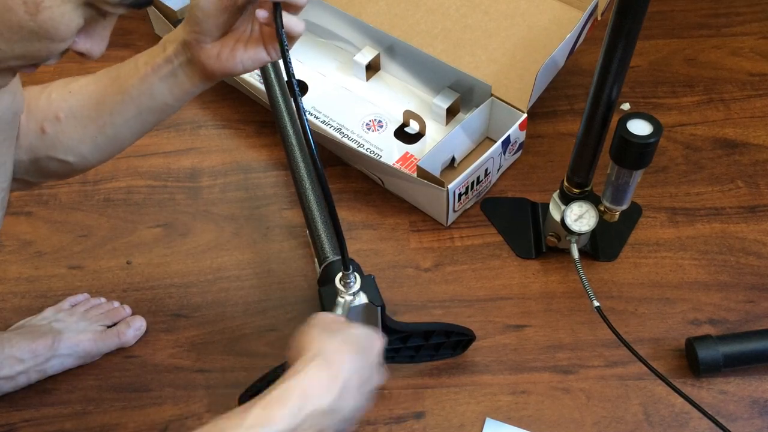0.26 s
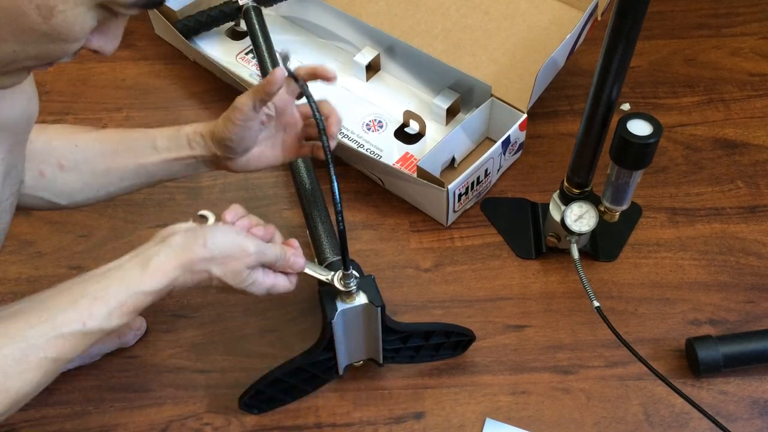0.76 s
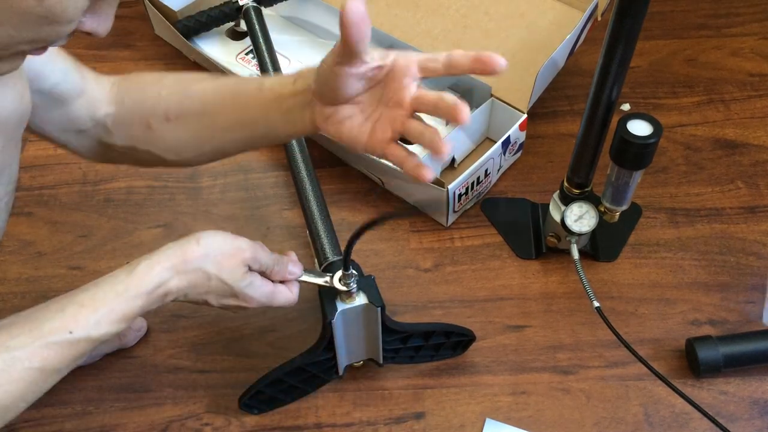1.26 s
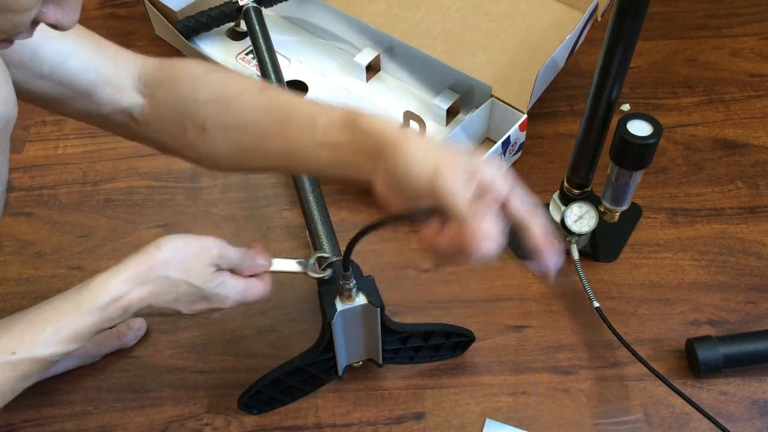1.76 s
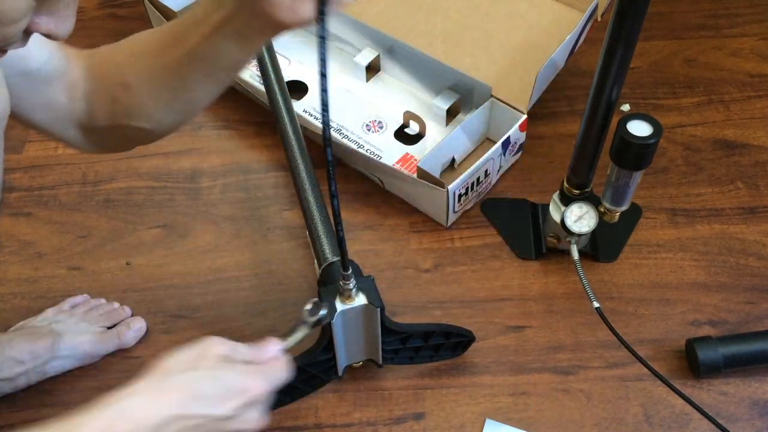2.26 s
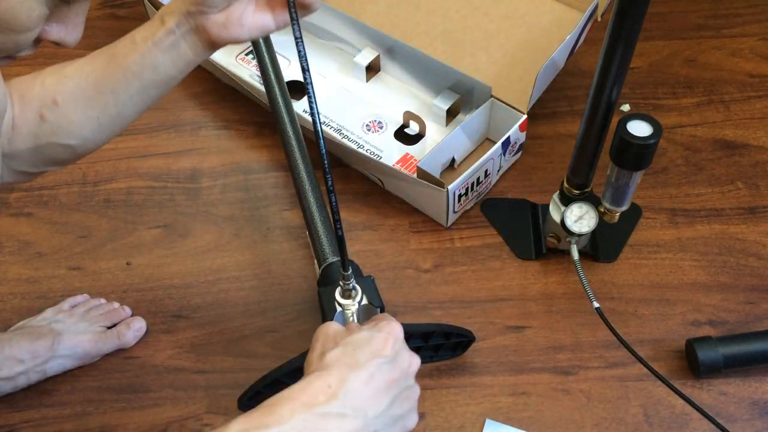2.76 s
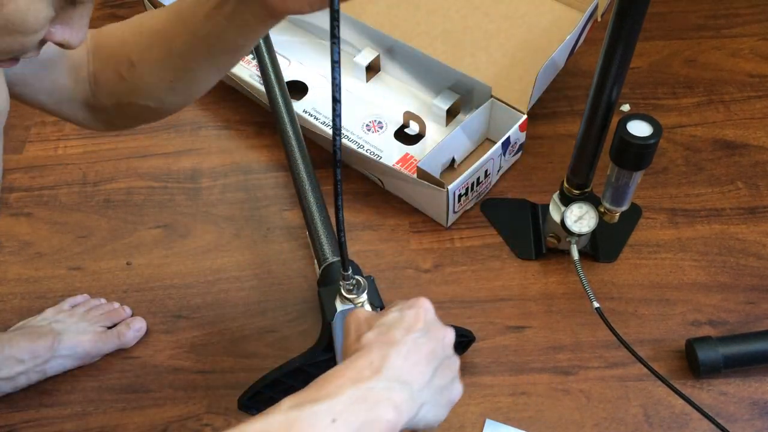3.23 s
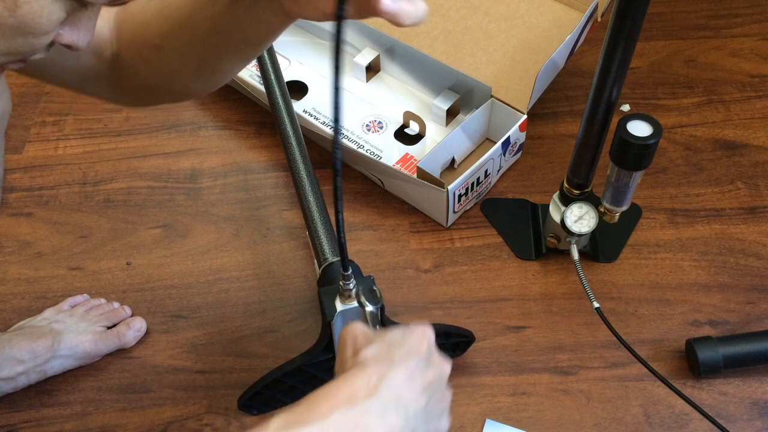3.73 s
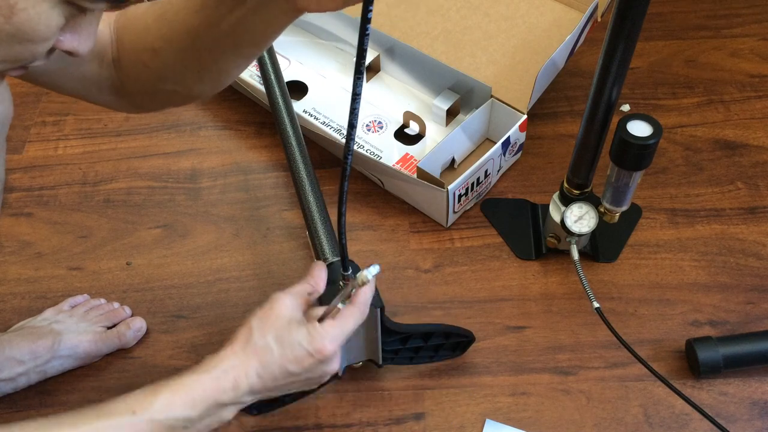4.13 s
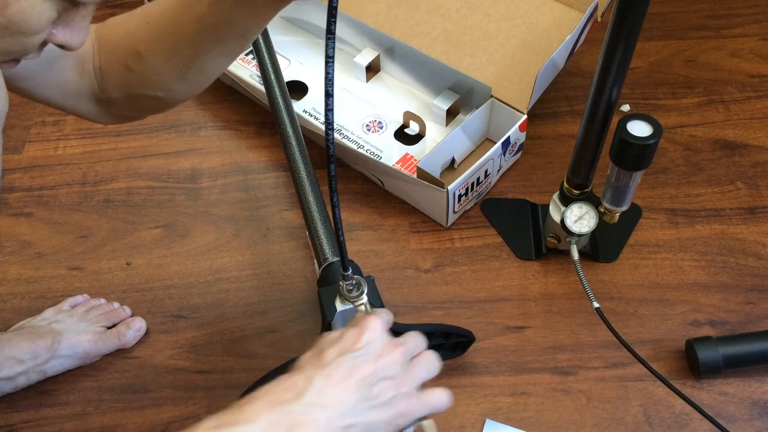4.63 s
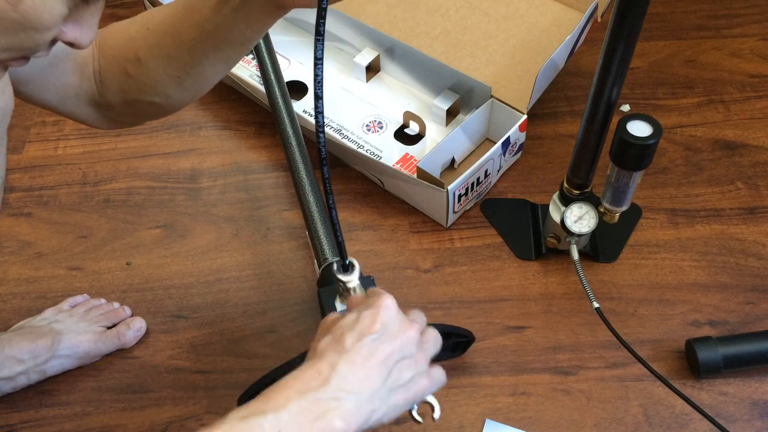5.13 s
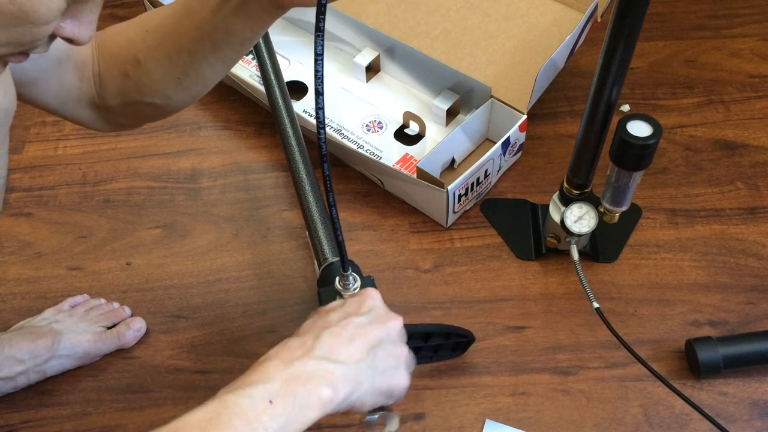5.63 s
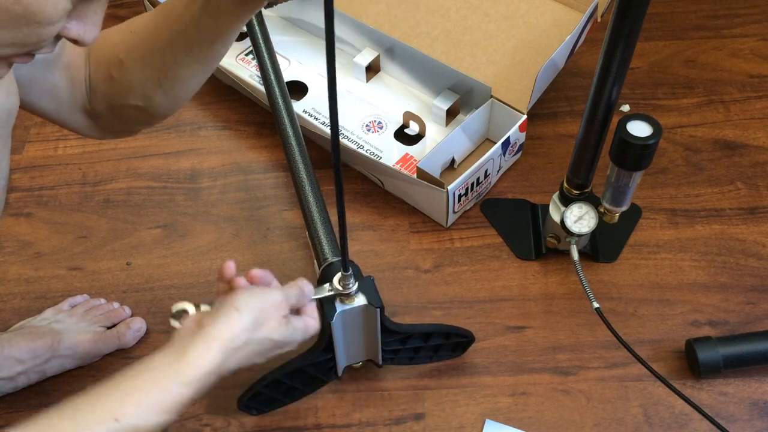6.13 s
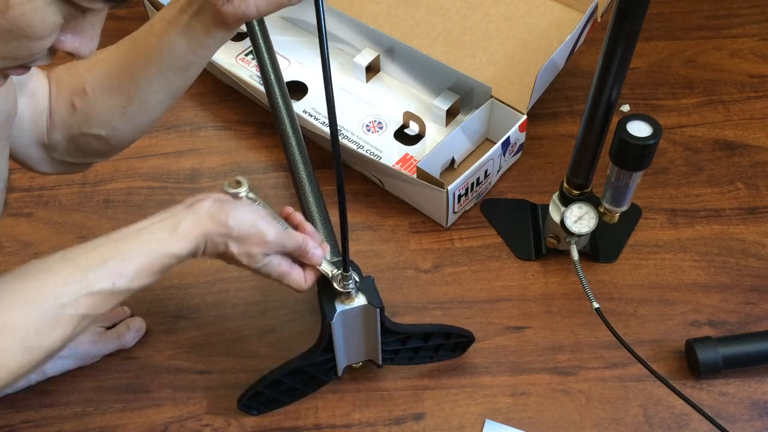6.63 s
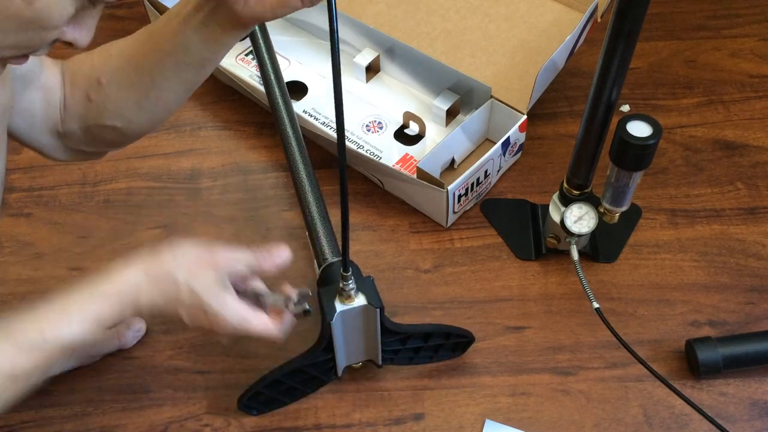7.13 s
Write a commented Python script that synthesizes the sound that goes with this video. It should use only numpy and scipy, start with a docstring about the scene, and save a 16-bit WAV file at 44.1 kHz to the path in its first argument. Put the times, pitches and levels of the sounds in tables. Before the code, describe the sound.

A small wrench clicks and clinks on a steel fitting in scattered clusters, with one hose slap on a wooden floor, in a quiet room.

```python
"""Knocks, clinks and gritty slides: a small wrench on the steel hose fitting of a hand pump on a wooden floor.
Each tap is a noise crack that rings damped modes of fitting, pump tube and boards; the wrench clinks on its own.
Slides are dense random catches with grit; a stiff hose slaps once, handling ticks and the boards thud softly.
A quiet furnished room answers with a diffuse noise tail, over rumble, hum and microphone hiss."""
import sys
import numpy as np
from scipy import signal
from scipy.fft import rfft, irfft, next_fast_len
from scipy.io import wavfile
from scipy.ndimage import uniform_filter1d

SR = 44100
rng = np.random.default_rng(int(sys.argv[2]) if len(sys.argv) > 2 else 0)


def materialize(psi):
    """Save the field psi as 16-bit PCM at rate SR to the path in sys.argv[1].

    A 1-D psi becomes a single channel; in a 2-D psi each row is a channel.
    """
    bounded = np.clip(np.atleast_2d(psi).T, -1, 1)
    quanta = np.round(bounded * 32767).astype(np.int16)
    wavfile.write(sys.argv[1], SR, quanta)


def ratio_of_db(decibels):
    """Turn decibels (scalar or array-like) into linear amplitude factors; 0 dB maps to 1."""
    return 10 ** (np.asarray(decibels, float) / 20)


N = 325458

# Wrench on fitting, levels before the layer trims. Each row: start in seconds, crack level in dB,
# then boards, tube and treble level in dB relative to the crack.
TAPS = [(0.0154, -60, 7, -7, -18), (0.0388, -53, 5, 15, -8), (0.0735, -33.5, -11.5, -3.5, -21),
        (0.0839, -34, -25, -3.5, -22), (0.087, -33.5, -10.5, -12, 13), (0.2528, -51.5, -3, 0.5, -19),
        (1.0143, -68.5, 1, 20, -14), (1.0285, -48.5, -8, -3.5, -53), (2.7169, -19, -16.5, -11.5, -6.5),
        (2.7393, -31.5, -6.5, 0, -1), (2.959, -28, -10.5, -5, -10.5), (3.239, -37.5, -5.5, -3, -23),
        (3.3229, -30.5, -31.5, -17, -19.5), (3.697, -66, -2, 8, -20), (4.7093, -23, -20, -14, -12),
        (4.7319, -39, -12.5, -0.5, -25), (4.768, -31, -31, -20.5, -24), (4.9052, -36.5, -34, -16.5, -25),
        (5.0836, -31, -8, -11.5, -6), (5.1083, -30, -14, -11.5, -2), (5.18, -37.5, -25, -42, -17),
        (5.201, -42, -11, -6.5, 9), (5.2789, -25.5, -19, -11, -24), (5.2996, -27.5, -8, -5.5, -41),
        (5.3268, -23.5, -17.5, -14, -39), (5.3646, -21, -19.5, -20.5, -12), (5.3684, -19, -21, -20, -8.5),
        (5.5039, -30, -8, -5.5, -39), (5.5928, -65.5, 6, 19, -9.5), (6.8687, -43, -12.5, 4, -23),
        (6.8908, -36.5, -10.5, -4.5, -25), (6.9091, -23.5, -27, -10.5, 5), (6.9376, -28, -12, -15, -12),
        (6.9624, -21.5, -20, -21.5, 1), (6.9886, -25.5, -18, -32, -11)]
# Ringing modes of the pump tube. Each row: frequency in Hz, relative level in dB, t60 in seconds.
TUBE = [(355, -6, 0.13), (493, -6, 0.03), (566, -5.5, .06), (700, -9.5, .05), (861, -7.5, 0.13),
        (910, -5.5, 0.17), (1019.3, -1.5, 0.13), (1134, -4.5, 0.053), (1243, -7.5, 0.087),
        (1417, -8.5, 0.059), (1611.5, -7, 0.056), (1963, -10.5, 0.067)]
# Ringing modes of the floor boards. Each row: frequency in Hz, relative level in dB, t60 in seconds.
BOARDS = [(72, -11.5, 0.49), (110.04, -10, 0.35), (161, -19.5, 0.096), (183.4, 2, .18), (230, -13.5, 0.13),
          (303.5, -8, 0.18), (345, -5, 0.099)]


def colour(noise, points):
    """Shape the spectrum of a noise by (Hz, dB) points, then bring it back to rms 1."""
    hz, db = np.transpose(points)
    size = next_fast_len(len(noise))
    f = np.fft.rfftfreq(size, 1 / SR) + 1
    gain = ratio_of_db(np.interp(np.log(f), np.log(hz), db))
    shaped = irfft(rfft(noise, size) * gain, size)[:len(noise)]
    return shaped / np.sqrt(np.mean(shaped ** 2))


def hump(hz, centre_hz, db_per_octave):
    """Levels in dB that fall away on both sides of a centre."""
    return -db_per_octave * np.abs(np.log2(np.asarray(hz) / centre_hz))


def walk(rate):
    """Random levels, each held 1 / rate seconds, then smoothed twice into slow ramps."""
    hold = int(SR / rate)
    steps = np.repeat(rng.standard_normal(N // hold + 1), hold)
    return uniform_filter1d(uniform_filter1d(steps, hold), hold)[:N]


def ring(drive, hz, t60):
    """One damped mode as a resonator; a unit blow rings with amplitude near 1."""
    radius = np.exp(-np.log(1000) / (max(t60, .005) * SR))
    w = 2 * np.pi * hz / SR
    return signal.lfilter([np.sin(w)], [1, -2 * radius * np.cos(w), radius * radius], drive)


def strike(modes, s, db, scatter_db, push_ms, detune, flutter_db):
    """Blows at times s ring damped modes, with random scatter in each mode's level, phase and pitch.

    db is given per blow, or per mode and blow; detune is a share of the frequency."""
    hz, mode_db, t60 = np.transpose(modes)[:, :, None]
    out = np.zeros(N + SR)
    t = np.arange(int(SR * min(t60.max(), .5))) / SR
    chance = rng.standard_normal((len(s), 3, len(modes), 1))
    db = np.broadcast_to(db, (len(modes), len(s)))
    # random level flutter roughens every ringing mode
    flutter = ratio_of_db(flutter_db * walk(120))
    start = rng.integers(0, N - len(t), (len(s), len(modes)))
    push_s = np.clip(np.broadcast_to(push_ms, len(s)), .1, 60) / 1000
    decay = np.exp(-np.log(1000) * t / np.maximum(t60, .005))
    for k, (level, pitch, phase) in enumerate(chance):
        fade = decay * (1 - np.exp(-t / push_s[k]))  # a longer push swells in more slowly
        tone = np.sin(2 * np.pi * (hz * (1 + detune * pitch) * t + phase))
        tone *= [flutter[i:i + len(t)] for i in start[k]]
        gain = ratio_of_db(db[:, k:k + 1] + mode_db + scatter_db * level)
        at = int(s[k] * SR)
        out[at:at + len(t)] += np.sum(gain * fade * tone, axis=0)
    return out[:N]


def add_burst(out, s, db, points, fall_s):
    """Mix in a short coloured noise that falls exponentially with time constant fall_s."""
    at, t = int(s * SR), np.arange(2048) / SR
    burst = colour(rng.standard_normal(len(t)), points) * np.exp(-t / fall_s) * ratio_of_db(db)
    out[at:at + len(t)] += burst[:N - at]


def cracks():
    """Contact noise of each tap, as bright as the contact."""
    out = np.zeros(N)
    for s, db, _, tube_db, treble_db in TAPS:
        points = [(150, tube_db + 2.0), (1200, tube_db + 11.5), (3500, 0),
                  (7000, treble_db / 2 + 3.5), (13000, treble_db + 3.5)]
        add_burst(out, s, db - 8.5, points, fall_s=0.00392)
    return out


def taps():
    """Crack, then fitting, tube and boards ring; the boards take a longer, softer push."""
    # Modes of the steel fitting. Each row: frequency in Hz, relative level in dB, t60 in seconds.
    fitting_modes = [(2140, -13, 0.019), (2480, 7, 0.012), (3093, -4.5, 0.036), (5010, -1, 0.021),
                     (5950, 0.5, 0.012), (7380, -4.5, 0.014), (9200, 2.5, 0.017), (11030, -2, 0.012)]
    s, db, boards_db, tube_db, treble_db = np.transpose(TAPS)
    scatter_db = 2.5
    # the tap's treble level comes in gradually from 3.5 to 13 kHz
    height = np.clip(np.log(np.array(fitting_modes)[:, :1] / 3500) / np.log(13000 / 3500), 0, 1)
    fitting_db = db - 15.5 + (treble_db + 4.0) * height
    fitting = strike(fitting_modes, s, fitting_db, scatter_db, 0.9, 0.03, scatter_db)
    tube = strike(TUBE, s, db + tube_db - 8.0, scatter_db, 0.49, 0.014, 2 * scatter_db)
    boards = strike(BOARDS[2:], s, db + boards_db + 3.5, scatter_db / 2, 10.2, 0.0087, scatter_db)
    return cracks() + fitting + tube + boards


def clinks():
    """A blow near a node of a bending mode hardly rings it; harder contact tilts the ring to the treble."""
    # Wrench modes. Each row: frequency in Hz, relative level in dB, t60 in seconds.
    wrench_modes = [(4390, -9, .14), (4470, -11, .12), (5400, -9, .12), (7290, -4, .2), (7380, -6, .16),
                    (9700, -5, .14), (11580, 0, .22), (11760, -6, .12), (12520, 0, .1), (13230, -2, .22),
                    (15150, -3, .15)]
    # The loosely held wrench rings on. Each row: start in seconds, level in dB before the mode shape,
    # spot hit as a share of its length, tilt in dB per octave.
    blows = [(0.0874, -55, 0.414, -7), (1.69, -57.5, 0.638, -3), (2.7172, -44.5, 0.84, 3.5),
             (2.8684, -63.5, 0.936, 3), (2.9597, -57, 0.408, -14.0), (3.322, -51.5, 0.435, -20),
             (3.6973, -67.5, 0.804, -6), (4.7088, -44.5, 0.542, 0.2), (4.7686, -50.5, 0.41, -11.5),
             (4.903, -61, 0.422, -17), (5.084, -53, 0.636, -1.5), (5.1062, -40, 0.64, -1),
             (5.198, -53, 0.254, -15.5), (5.279, -49, 0.94, -7), (5.3253, -54, 0.654, -4),
             (5.364, -39, 0.422, -7), (6.9094, -40, 0.66, 2.5), (6.938, -39, 0.962, -8),
             (6.9608, -39.5, 0.578, -11)]
    bending_hz, node_leak, tilt_centre_hz = 150, .03, 7300  # one half-wave fits the wrench at bending_hz
    s, db, spot, tilt_db = np.transpose(blows)
    hz = np.array(wrench_modes)[:, :1]
    half_waves = np.sqrt(hz / bending_hz)
    shape = np.abs(np.cos(np.pi * spot * half_waves)) + node_leak
    mode_db = db + 20 * np.log10(shape) + tilt_db * np.log2(hz / tilt_centre_hz)
    return strike(wrench_modes, s, mode_db, scatter_db=0.66, push_ms=0.14, detune=0.00163, flutter_db=5)


def slide():
    """Dense uneven catches of jaws and hose ring tube and boards; grit hisses along."""
    # One stroke a row, before the layer trims. Each row: time of full strength in seconds,
    # hold in seconds, level in dB, treble in dB relative to that level.
    strokes = [(0.002, 0.062, -49.5, -4.5), (0.081, 0.0054, -49, 7), (0.255, 0.09, -69, -23),
               (1.0, 0.12, -69, -26), (1.028, 0.0038, -72, -31), (1.24, .11, -67, -16.5),
               (1.459, .018, -45.5, -26), (1.496, 0.042, -27.5, -10), (1.581, 0.011, -33, -19),
               (1.66, 0.18, -53, -11), (2.956, .004, -49, -4), (4.723, 0.014, -39.5, -19.5),
               (4.768, .006, -49.5, -21.5), (5.205, 0.031, -48, -12), (5.286, 0.0035, -32.5, -23),
               (5.365, 0.01, -34.5, -14), (6.876, .025, -49, -16), (6.908, 0.056, -38.5, -2),
               (6.959, 0.038, -35, -6)]
    # Grit spectrum. Each row: frequency in Hz, relative level in dB per Hz.
    grit_colour = [(150, -30.5), (250, -2.5), (889, -2), (1330, -8.5), (2990, -12.5), (3340, -20),
                   (4480, -15.5), (7000, -21.5), (9100, -43), (15400, -120)]
    rise_db_per_s, fall_db_per_s = 1799, 402
    t, gain, treble = np.arange(N) / SR, np.zeros(N), np.zeros(N)
    for s, held_s, db, treble_db in strokes:
        rise_db = rise_db_per_s * np.maximum(s - t, 0)
        fall_db = fall_db_per_s * np.maximum(t - s - held_s, 0)
        stroke = ratio_of_db(db - rise_db - fall_db)
        gain += stroke
        treble += stroke * ratio_of_db(treble_db)
    happens = rng.random(N) < 2500 / SR  # about 2500 catches a second
    catches = rng.standard_normal(N) * ratio_of_db(2.6 * rng.exponential(size=N)) * happens
    catches = gain * ratio_of_db(5 * walk(60)) * catches / catches.std()
    body = sum(ratio_of_db(db) * ring(catches, hz, t60) for hz, db, t60 in TUBE + BOARDS[3:])
    grit = gain * colour(rng.standard_normal(N), grit_colour)
    hiss_colour = [(3000, -24.5), (8000, -4.5), (12000, -1.0), (15500, -1.5)]
    hiss = treble * colour(rng.standard_normal(N), hiss_colour)
    return ratio_of_db(-43.5) * body + ratio_of_db(2.9 * walk(150)) * (ratio_of_db(-9) * grit + ratio_of_db(-13) * hiss)


def slap():
    """The hose end lands flat on the floor: a broad noise slap and the short hollow ring of the hose."""
    # Hose modes. Each row: frequency in Hz, relative level in dB, t60 in seconds.
    hose_modes = [(520, -13.5, .03), (695, -3.5, 0.011), (896, 2, 0.06), (995, -1, 0.035),
                  (1154, -4, 0.048), (1397, -1, 0.023), (1557, -2.5, 0.031), (1760, -2.5, .02),
                  (2710, -16.5, 0.028)]
    # Slap spectrum. Each row: frequency in Hz, relative level in dB per Hz.
    slap_colour = [(59, -41.5), (100, -14), (367, -13.5), (942, -9), (1880, -13), (3180, -20.5),
                   (5960, -24.5), (6480, -24.5), (15000, -35.5)]
    # The one landing: start in seconds, level in dB before the layer trims.
    landing = (1.4795, -2.5)
    s, db = landing
    out = strike(hose_modes, [s], db - 6.0, scatter_db=0.99, push_ms=1.6, detune=.004, flutter_db=1.8)
    add_burst(out, s, db - 9.5, slap_colour, fall_s=.008)
    return out


def ticks():
    """Dry little noise clicks, each with its brightest region, and one sharper snap."""
    # Fingers, hose and jaws tick. Each row: start in seconds, level in dB, brightest frequency in Hz.
    clicks = [(0.447, -52.5, 3930), (0.6988, -56.5, 3500), (1.469, -56, 11200), (1.5983, -46, 5700),
              (1.6276, -43, 4500), (1.6914, -53, 3050), (1.7158, -49, 2040), (1.786, -56, 12500),
              (1.813, -57, 5050), (2.012, -63.5, 2496), (2.0574, -50.5, 7190), (2.079, -48.5, 6910),
              (2.0895, -51, 2250), (2.0944, -47.5, 7780), (2.1972, -62, 2980), (2.2188, -59, 2970),
              (2.2383, -51.5, 10040), (2.253, -48, 4890), (2.358, -55, 5030), (2.3716, -57.5, 3140),
              (2.5256, -59, 6170), (3.896, -56, 7650), (4.0604, -66, 6540), (4.4494, -65.5, 7880),
              (5.9306, -57, 5080), (6.0385, -64, 7440), (6.697, -58.5, 2730)]
    # The jaw snaps off the nut: start in seconds, level in dB, brightest frequency in Hz,
    # fall in dB per octave, contact in milliseconds.
    snap = (5.5056, -19, 13200, 14, 1.0)
    fall_db_per_octave, click_contact_ms = 5.0, 2.97
    out, hz = np.zeros(N), np.geomspace(100, 16000, num=24)
    events = [(*click, fall_db_per_octave, click_contact_ms) for click in clicks] + [snap]
    for s, db, bright_hz, fall_db, contact_ms in events:
        add_burst(out, s, db, np.c_[hz, hump(hz, bright_hz, fall_db)], contact_ms / 1000)
    return out


def thuds():
    """Low thuds of the floor boards, some under the hose landing, its bounce and hard knocks."""
    # Each row: start in seconds, level in dB before the layer trim, brightest frequency in Hz,
    # push in milliseconds.
    blows = [(.09, -44.5, 99, 8.6), (1.038, -56, 103, 8.3), (1.488, -41, 170.2, 2.3),
             (1.497, -45.5, 105.3, 33), (1.75, -44.5, 230, 7.9), (4.71, -44, 340, 1.9),
             (4.741, -54, 170, 10), (5.279, -40.5, 317, 2), (5.299, -42.5, 74, 21), (5.515, -38, 94.2, 10)]
    s, db, bright_hz, push_ms = np.transpose(blows)
    mode_db = db + 10.5 + hump(np.array(BOARDS)[:, :1], bright_hz, 9.1)
    return strike(BOARDS, s, mode_db, 1.5, push_ms, detune=.01, flutter_db=3)


def room(dry):
    """Diffuse noise tail, each band with its own decay, building up over a few milliseconds."""
    # Tail bands. Each row: centre in Hz, t60 in seconds, band gain in dB.
    bands = [(123, 0.27, -14.5), (310.8, .45, -10.5), (670, 0.33, -9), (1390, .42, -6), (3500, 0.38, -5),
             (6640, 0.25, -10), (13200, 0.31, -11.5)]
    t, tail = np.arange(SR // 2) / SR, 0
    for hz, t60, db in bands:
        sos = signal.butter(2, [hz / 1.5, min(hz * 1.5, .45 * SR)], "band", fs=SR, output="sos")
        band = signal.sosfilt(sos, rng.standard_normal(len(t)))
        fade = np.exp(-np.log(1000) * t / t60) * (1 - np.exp(-t / 0.002))
        tail = tail + ratio_of_db(db) * band * fade / np.sqrt(np.sum(fade ** 2))
    # high-pass, as of a small microphone: little deep bass in the knocks
    dry = signal.sosfilt(signal.butter(3, 70, "high", fs=SR, output="sos"), dry)
    return dry + signal.oaconvolve(dry, tail)[:N]


def air():
    """Rumble that swells a little, appliance hum that wavers, steady hiss."""
    # Background spectrum. Each row: frequency in Hz, relative level in dB per Hz.
    air_colour = [(12, -34), (20, -0.5), (150, 2), (210, -13), (248, -7), (270, -20.5), (310, -12.5),
                  (624, -14), (780, -21.5), (897, -22), (3840, -31), (5380, -29.5), (11800, -34),
                  (14700, -38), (16000, -42)]
    # Hum partials. Each row: frequency in Hz, peak level in dB about which it wavers.
    hum_partials = [(26.9, -82), (123.8, -77), (150.7, -76.5), (242.2, -77.5), (629.8, -84.5)]
    t, noise = np.arange(N) / SR, colour(rng.standard_normal(N), air_colour)
    low = signal.sosfilt(signal.butter(2, 700, fs=SR, output="sos"), noise)
    noise = noise + low * (ratio_of_db(2.2 * walk(6.1)) - 1)  # only the lows swell
    hum = sum(ratio_of_db(db + 1.0 * walk(14)) * np.sin(2 * np.pi * hz * t) for hz, db in hum_partials)
    return ratio_of_db(-65) * noise + hum


def scene():
    """Everything handled sounds in the room, over its air."""
    handled = taps() + clinks() + slap() + thuds() + slide() + ticks()
    return (room(handled) + air())[None]


def low_pass(x):
    """Removes everything above the highest recorded frequency."""
    return signal.sosfilt(signal.butter(12, 16640, fs=SR, output="sos"), x)


def record(dry):
    """A phone microphone that rounds loud peaks and cuts the very top."""
    rounding, top_hz = .9, 15250  # loud peaks bend towards 1 / rounding
    rounded = np.tanh(rounding * dry) / rounding
    finished = signal.sosfilt(signal.ellip(6, .3, 30, top_hz, fs=SR, output="sos"), rounded)
    return low_pass(finished)


dry = scene()
out = record(dry)
materialize(out)
```